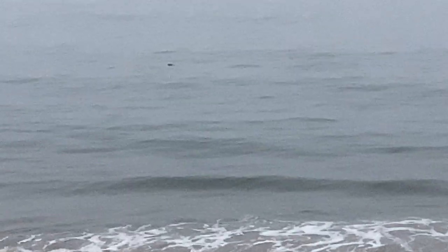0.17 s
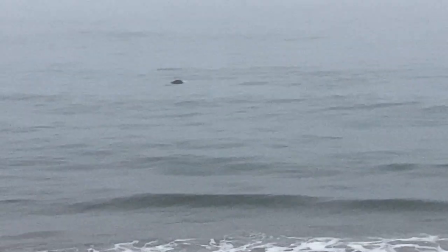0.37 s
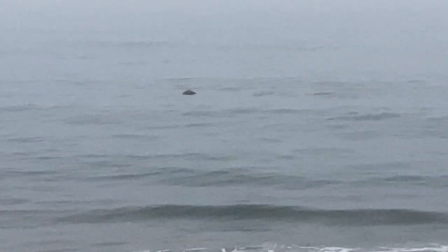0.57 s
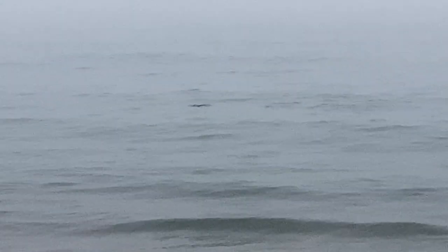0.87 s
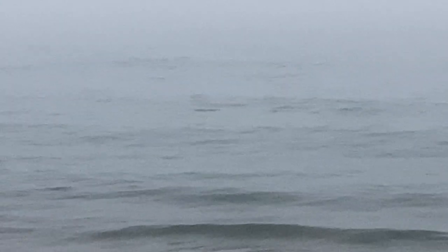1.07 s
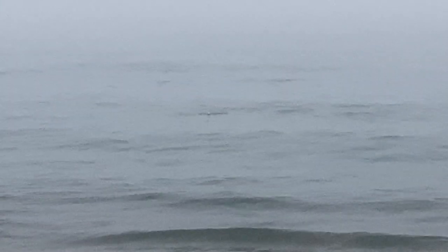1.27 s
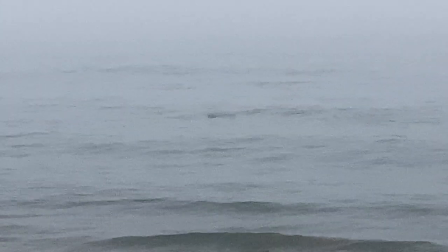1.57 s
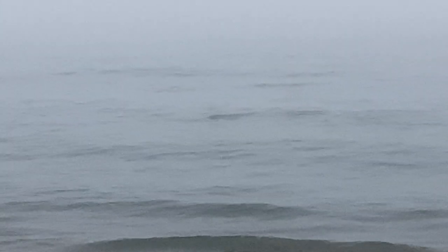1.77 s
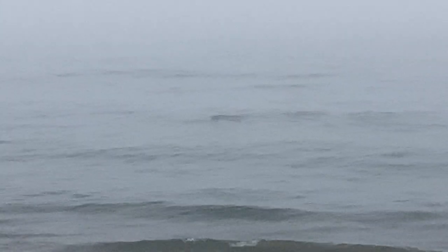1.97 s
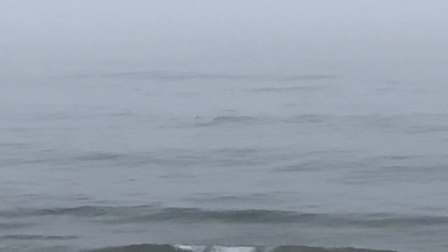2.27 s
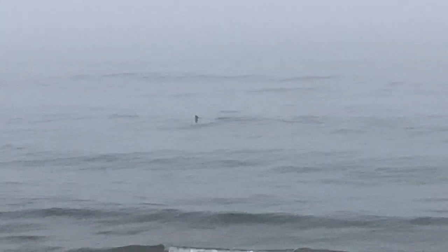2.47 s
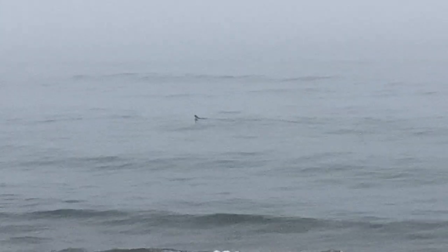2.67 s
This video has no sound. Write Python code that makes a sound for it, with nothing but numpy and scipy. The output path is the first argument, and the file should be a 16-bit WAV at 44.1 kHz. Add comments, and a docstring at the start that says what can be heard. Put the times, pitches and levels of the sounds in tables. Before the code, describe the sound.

Small waves on a beach: fizzing foam from a spent wave dies down over steady distant surf, a sea bird rasps faintly twice, then a new wave breaks brighter; light wind rumbles on a small mono microphone.

```python
"""The foam of a spent wave fizzes away on a foggy beach: patchy noise mixed with damped bubble tones.
Far surf roars on as smoother noise, and wind rumbles on the port of a small mono microphone as low noise.
Bright spits of spray are short noise bands; a sea bird rasps faintly twice, as noisy pulses through two
resonances, and one rough spit of spray is formed in the same way.
The next wave, built like the foam, spills dull and breaks bright."""
import sys
import numpy as np
from scipy import signal
from scipy.fft import rfft, irfft, next_fast_len
from scipy.io import wavfile
from scipy.ndimage import uniform_filter1d, map_coordinates

SR = 44100
rng = np.random.default_rng(int(sys.argv[2]) if len(sys.argv) > 2 else 0)


def bounce(signal):
    """Save signal as a 16-bit WAV file at the path given by the first command-line argument."""
    frames = np.transpose(np.atleast_2d(signal))
    limited = np.clip(frames, -1, 1)
    pcm = np.round(limited * 32767).astype(np.int16)
    wavfile.write(sys.argv[1], SR, pcm)


N = 124803

# Spectrum of the water as the small microphone hears it: (frequency [Hz], relative level [dB])
SEA_AND_MIC_COLOUR = [(15, -80), (30, -42), (55, -13), (80, -4), (150, -4), (290, -2.5), (400, -6),
                      (500, -2.5), (740, -2.5), (1050, -3), (1230, -7), (1800, -6), (2500, -10.5),
                      (3050, -13.5), (3500, -11), (5700, -17), (6110, -16), (6210, -22), (7800, -23.5),
                      (11000, -23.5), (13000, -29.5), (14600, -41.5), (15600, -51)]
# Dying foam, before its fizz is scaled: (time [s], level [dB], fizz gain [dB])
FOAM_COURSE = [(0, -38.5, -2), (.15, -42, -0.5), (.3, -41, 0.5), (.45, -42.5, -0.5), (.6, -44, 0.5),
               (.75, -43.5, 1), (.9, -42.5, -2), (1.1, -45, -0.5), (1.3, -47, -1.5), (1.48, -46, -4.5),
               (1.6, -55.5, -2), (1.78, -56.5, -3), (1.86, -52, -7), (2.3, -59, -3), (2.83, -60, -1)]
# Foam spectrum over the shared water colour: (frequency [Hz], gain [dB])
FOAM_COLOUR = [(100, -6), (600, -1.5), (1200, -1), (2500, -4.5), (3600, -2), (5500, -1.5), (10000, -0.5)]
# Far surf spectrum over the shared water colour: (frequency [Hz], gain [dB])
FAR_COLOUR = [(100, -1), (400, -0.5), (1000, 0.5), (2200, -0.5), (3500, -2), (10000, -0.5)]
# Wind rumble level, wavering at random: (time [s], level [dB])
WIND_COURSE = [(0, -52.5), (.45, -52), (.7, -58), (1.2, -57.5), (1.36, -51), (1.6, -59), (2.2, -60),
               (2.55, -53), (2.83, -55)]
# Wind rumble spectrum: (frequency [Hz], relative level [dB])
RUMBLE_COLOUR = [(15, -80), (30, -45), (55, -14), (85, -1), (200, -5), (350, -10), (800, -25), (2000, -82)]
# Spits of spray: (time of peak [s], centre frequency [Hz], peak level [dB])
SPRAY_SPITS = [(.26, 4800, -51), (.58, 3600, -54), (.71, 8500, -58), (1.05, 6000, -57), (1.12, 3380, -52),
               (2.08, 10300, -59), (2.3, 2520, -49), (2.72, 2300, -47)]
# Two bird calls, then a rough spit of spray brightest near the upper resonance:
# (start time [s], length [s], level [dB], upper resonance gain [dB])
ROUGH_BURSTS = [(.965, .075, -52, 2), (1.394, .066, -50, -3), (1.66, .07, -58, 6)]
# Resonances of the bird's throat, also shaping the rough spit: (centre frequency [Hz], width [Hz])
RESONANCES = [(3430, 600), (4560, 480)]
# Spilling and breaking wave, before its spray is scaled: (time [s], level [dB], spray gain [dB])
BREAKER_COURSE = [(1.8, -78, 4), (1.9, -46.5, -10), (2.1, -48, -0.5), (2.2, -46, 3), (2.28, -41, -0.5),
                  (2.4, -41, 1), (2.5, -41, 1.5), (2.6, -42, 1.5), (2.72, -40, 1), (2.83, -38, -1.5)]
# Breaker spectrum over the shared water colour: (frequency [Hz], gain [dB])
BREAKER_COLOUR = [(100, 1), (250, 1), (800, 1), (1200, -2.5), (2600, 4.5), (3500, 0.5), (5500, 4.5),
                  (7000, 2.5), (8500, 3.5), (12000, 2)]

FAR_DB = -45.5
SPRAY_HZ = 3220  # spray and fizz hiss lie above this
BUBBLES_PER_S, BUBBLE_SPREAD_DB = 6000, 3
BUBBLE_HZ, BUBBLE_OCTAVES = 2144, 1.277  # median pitch, standard deviation
BUBBLE_CYCLES = 3.57  # nominal cycles in which a tone decays by exp(-3)
SPLASH_S, SPLASH_WIDTH = 0.016, 0.14  # Gaussian half length [s], half width over centre frequency
PULSE_RATE_HZ, PULSE_JITTER, BURST_EDGE_S = 190, 0.5, 0.003  # jitter is a fraction of the rate
START_S, FADE_IN_S, TOP_HZ = 0.0363, 0.00026, 15740


def amp(db):
    """Level law: amplitude ratio from decibels."""
    return 10 ** (np.asarray(db) / 20)


def unit(x):
    """Power normalization: scale to a root mean square of one."""
    return x / np.sqrt(np.mean(x ** 2) + 1e-20)


def along(points, hz):
    """Logarithmic frequency scale: interpolate (frequency, value) points on it."""
    f, v = np.transpose(points)
    return np.interp(np.log(hz + 1), np.log(f + 1), v)


def curve(rows):
    """Linear interpolation in time: one value per sample for each column after the time."""
    times, *columns = np.transpose(rows)
    t = np.arange(N) / SR
    return np.squeeze([np.interp(t, times, column) for column in columns])


def wobble(rate):
    """Slow random fluctuation: a smooth curve through random knots, rate of them a second."""
    return map_coordinates(rng.standard_normal(400), [np.arange(N) * rate / SR], mode="wrap")


def filtered(x, response):
    """Linear filtering: multiply the spectrum by a complex response of frequency."""
    m = next_fast_len(N + SR // 2)
    spectrum = rfft(x, m) * response(np.fft.rfftfreq(m, 1 / SR))
    return irfft(spectrum, m)[..., :N]


def brightened(x, db):
    """Band splitting: scale only the part above the spray edge."""
    low = filtered(x, lambda hz: 1 / (1 + (hz / SPRAY_HZ) ** 6))
    return low + amp(db) * (x - low)


def patchy(patchy_db):
    """Random modulation: white noise whose gain varies in patches of time and frequency."""
    cells = signal.stft(rng.standard_normal(N), nperseg=512)[2]
    field = uniform_filter1d(rng.standard_normal(cells.shape), size=6, axis=0)  # across frequency
    field = uniform_filter1d(field, size=8, axis=1)  # across time
    return unit(signal.istft(cells * amp(patchy_db * unit(field)), nperseg=512)[1][:N])


def bubbles():
    """Damped resonance: bursting bubbles ring as short tones of rising pitch, evened in colour."""
    count, length = int(BUBBLES_PER_S * N / SR), SR // 150
    starts = (rng.random((count, 1)) * N).astype(int)
    draws = rng.standard_normal((count, 2))
    hz = np.clip(BUBBLE_HZ * 2 ** (BUBBLE_OCTAVES * draws[:, :1]), 600, 14000)
    t = np.arange(length) / SR
    life = t * hz / BUBBLE_CYCLES
    envelope = amp(BUBBLE_SPREAD_DB * draws[:, 1:]) * life * np.exp(-3 * life)
    tones = envelope * np.sin(2 * np.pi * hz * t * (1 + 0.12 * np.minimum(life, 2)))
    places = starts + np.arange(length)
    x = np.bincount(places.ravel(), tones.ravel(), N + length)[:N]
    # Divide by the smoothed spectrum; the small floor limits the boost of weak bands
    mean = np.sqrt(uniform_filter1d(abs(rfft(x)) ** 2, size=900))
    floor, bins = 0.041 * mean.max(), np.fft.rfftfreq(N, 1 / SR)
    return unit(filtered(x, lambda f: 1 / (np.interp(f, bins, mean) + floor)))


def water(tint, patchy_db, bubble_share):
    """Power sharing: rushing noise and bubbles add by energy, then take the shared colour and a tint."""
    share = np.clip(bubble_share, 0, 1)
    raw = np.sqrt(1 - share) * patchy(patchy_db) + np.sqrt(share) * bubbles()
    return unit(filtered(raw, lambda hz: amp(along(SEA_AND_MIC_COLOUR, hz) + along(tint, hz))))


def foam():
    """Decaying aeration: the spent wave churns and fizzes away on the sand."""
    level_db, fizz_db = curve(FOAM_COURSE)
    churn = water(FOAM_COLOUR, patchy_db=1.3, bubble_share=0.18)
    return amp(level_db + 0.65 * wobble(8.9)) * brightened(churn, fizz_db)


def far_surf():
    """Stationary noise: a smooth roar along the shore, with no bubbles."""
    return amp(FAR_DB + 0.46 * wobble(3.24)) * water(FAR_COLOUR, patchy_db=0.73, bubble_share=0)


def wind():
    """Turbulence noise: a low rumble on the microphone port, from noise with a low-pitched colour."""
    rumble = unit(filtered(patchy(patchy_db=1.0), lambda hz: amp(along(RUMBLE_COLOUR, hz))))
    return amp(curve(WIND_COURSE) + 1.15 * wobble(13.4)) * rumble


def splashes():
    """Narrow-band bursts: small bright spits of spray, each noise under a Gaussian envelope."""
    t, out = np.arange(N) / SR, 0
    for s, centre_hz, db in SPRAY_SPITS:
        noise = rng.standard_normal(N)
        band = filtered(noise, lambda f: np.exp(-((f / centre_hz - 1) / SPLASH_WIDTH) ** 2))
        out = out + amp(db) * np.exp(-((t - s) / SPLASH_S) ** 2) * unit(band)
    return out


def rough_bursts(rows):
    """Source and filter: uneven noisy pulses excite two resonances."""
    t, out = np.arange(N) / SR, 0

    def resonance(f, centre, width):
        return (1j * f * width / (centre ** 2 - f ** 2 + 1j * f * width)) ** 2

    for s, length, db, upper_db in rows:
        phase = np.cumsum(PULSE_RATE_HZ * (1 + PULSE_JITTER * wobble(120))) / SR
        buzz = rng.standard_normal(N) * (0.48 + np.cos(np.pi * phase) ** 4)
        gains = [1, amp(upper_db)]
        resonant = filtered(buzz, lambda f: sum(
            g * resonance(f, centre, width) for g, (centre, width) in zip(gains, RESONANCES)))
        shape = np.clip(np.minimum(t - s, s + length - t) / BURST_EDGE_S, 0, 1)
        # The square root refers the level to the burst's own length
        out = out + amp(db) * unit(shape * resonant) * np.sqrt(length * SR / N)
    return out


def bird():
    """Vocal resonance: a sea bird rasps twice, its noisy pulses shaped by the throat."""
    return rough_bursts(ROUGH_BURSTS[:2])


def rough_splash():
    """Resonant noise burst: one rough spit of spray, strongest near the upper resonance."""
    return rough_bursts(ROUGH_BURSTS[2:])


def breaker():
    """Growing aeration: the next wave spills dull, then breaks bright."""
    level_db, spray_db = curve(BREAKER_COURSE)
    surge = water(BREAKER_COLOUR, patchy_db=1.4, bubble_share=0.21)
    return amp(level_db + 0.47 * wobble(9.47)) * brightened(surge, spray_db)


def scene():
    """Superposition: all sources add, alike in both channels."""
    beach = foam() + far_surf() + wind() + splashes() + bird() + rough_splash() + breaker()
    return np.array([beach, beach])


def record(dry):
    """Band limitation: sound starts after a short silence and is cut above the top frequency."""
    on = np.clip((np.arange(N) / SR - START_S) / FADE_IN_S, 0, 1)
    return filtered(dry * on, lambda hz: hz < TOP_HZ)


dry = scene()
out = record(dry)
bounce(out)
```